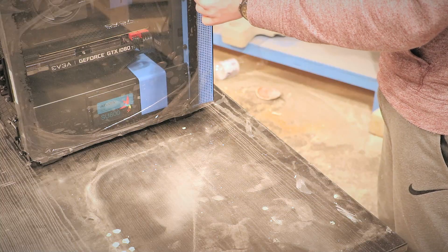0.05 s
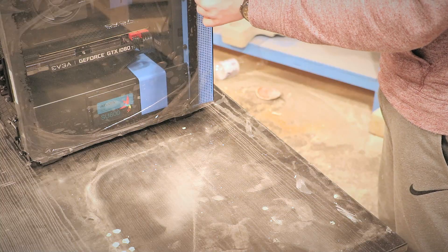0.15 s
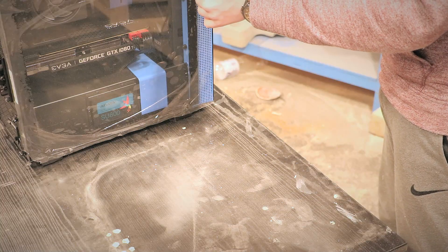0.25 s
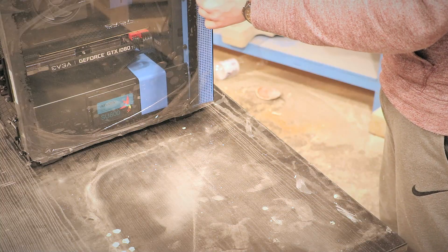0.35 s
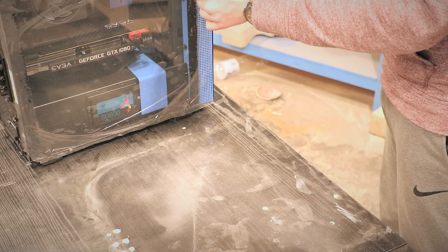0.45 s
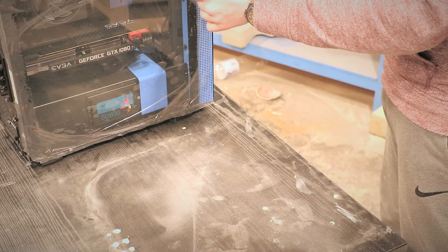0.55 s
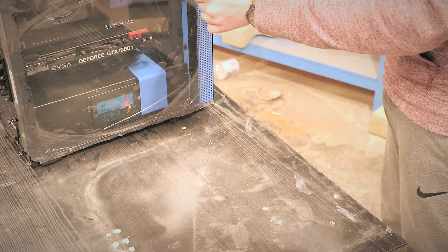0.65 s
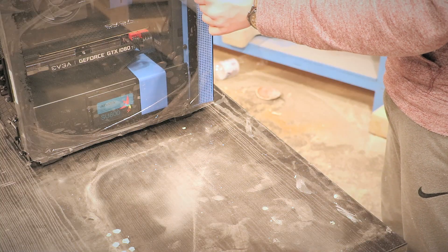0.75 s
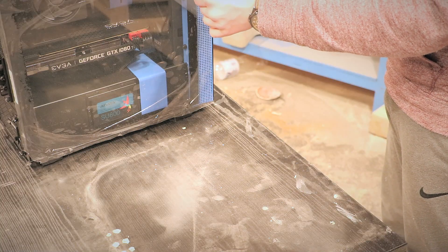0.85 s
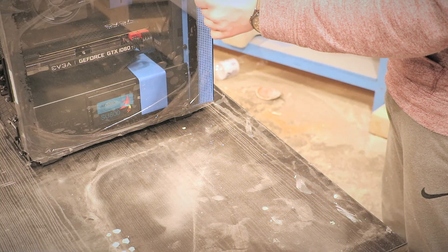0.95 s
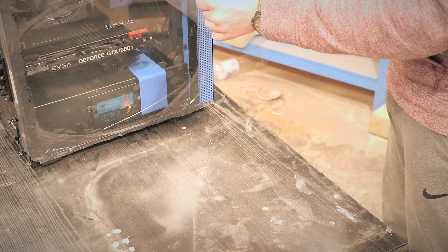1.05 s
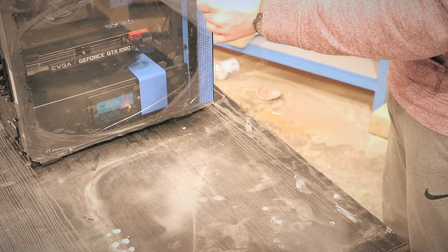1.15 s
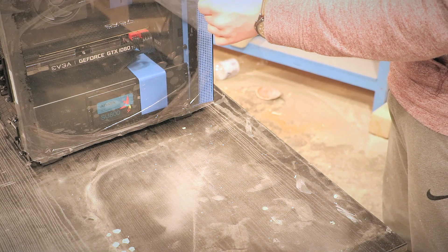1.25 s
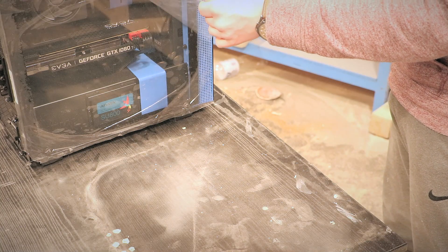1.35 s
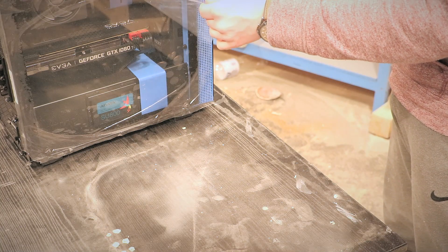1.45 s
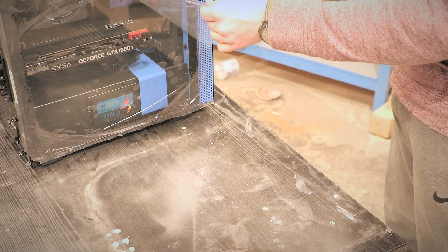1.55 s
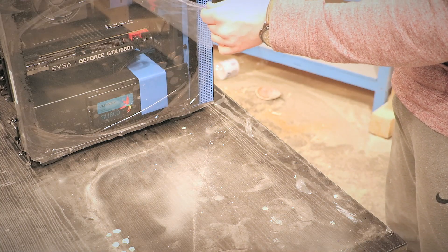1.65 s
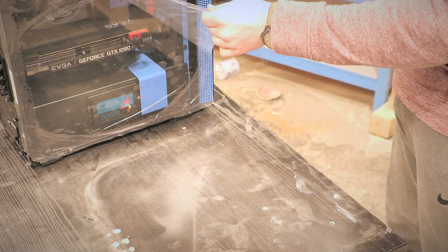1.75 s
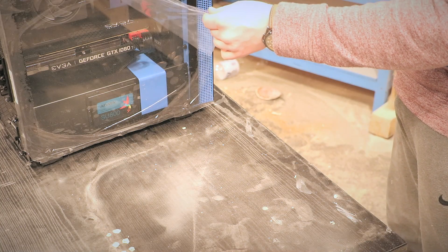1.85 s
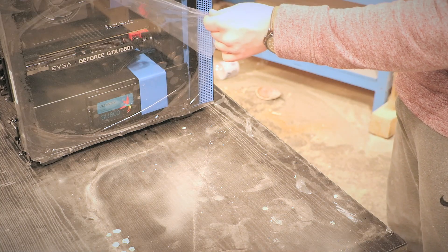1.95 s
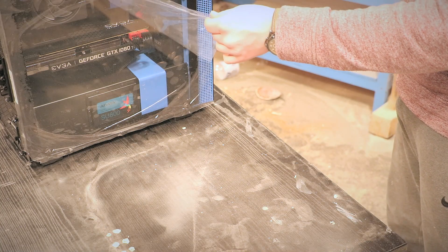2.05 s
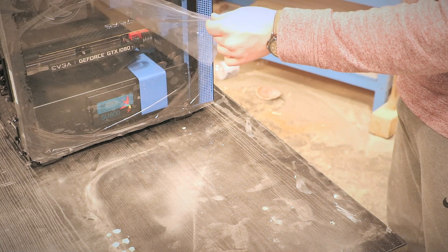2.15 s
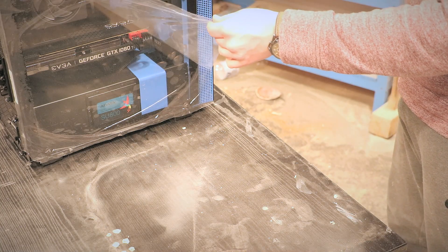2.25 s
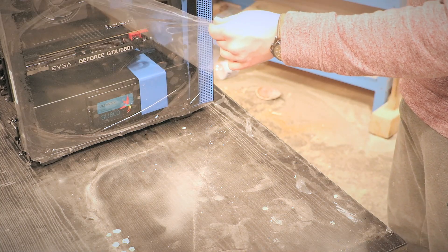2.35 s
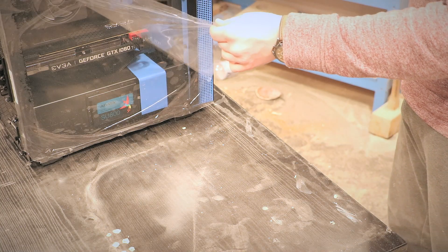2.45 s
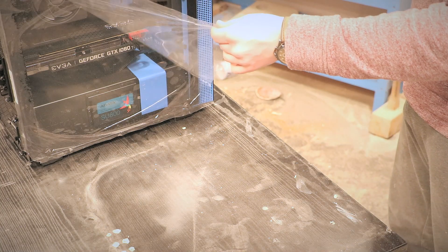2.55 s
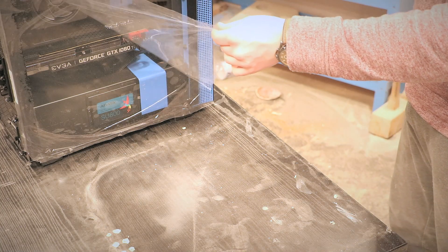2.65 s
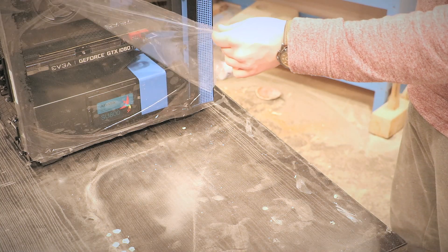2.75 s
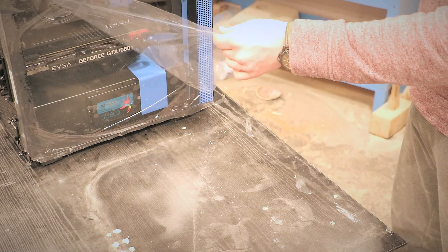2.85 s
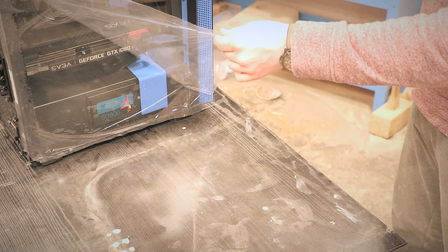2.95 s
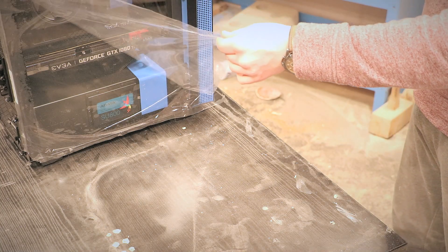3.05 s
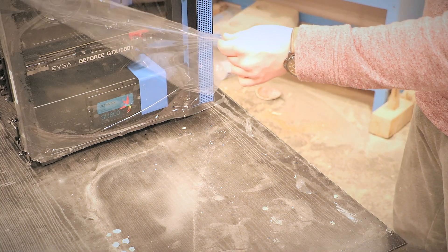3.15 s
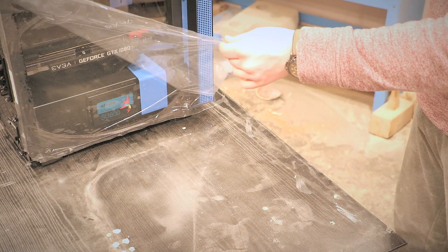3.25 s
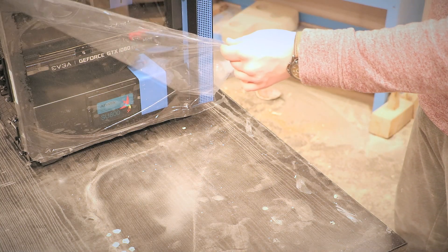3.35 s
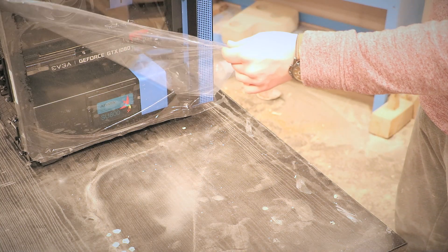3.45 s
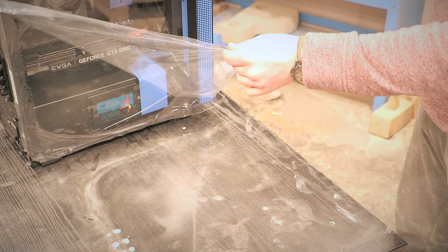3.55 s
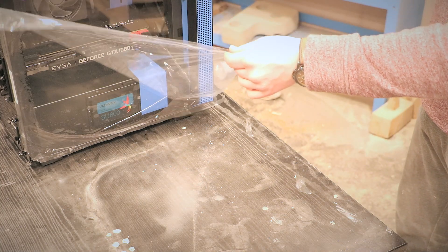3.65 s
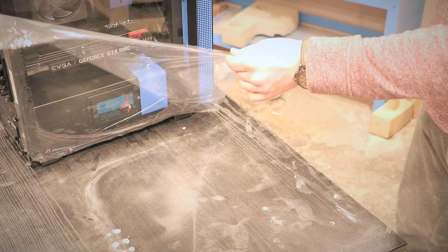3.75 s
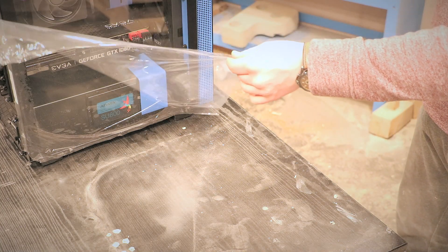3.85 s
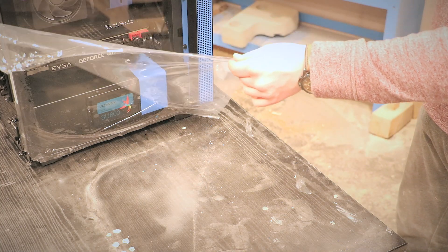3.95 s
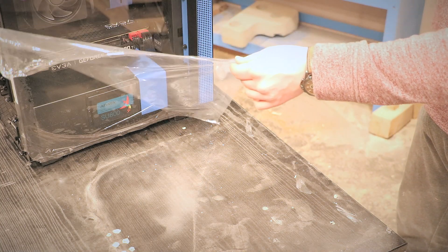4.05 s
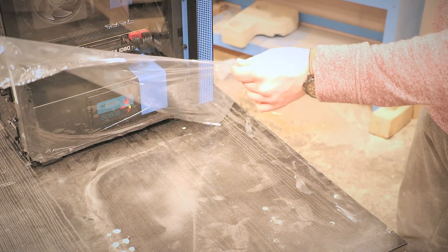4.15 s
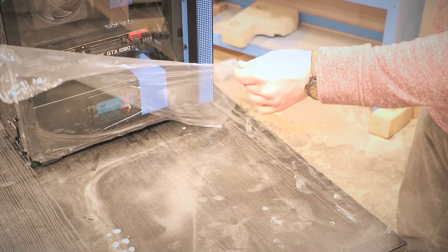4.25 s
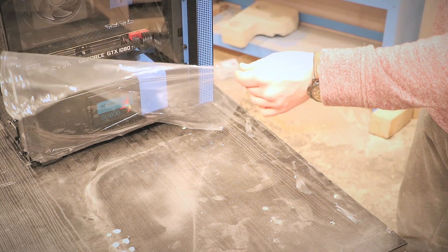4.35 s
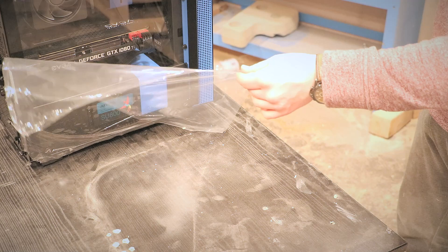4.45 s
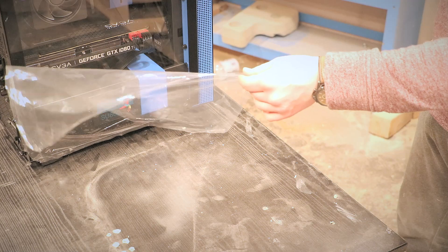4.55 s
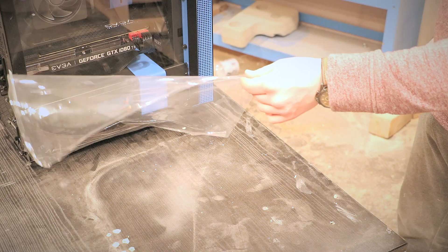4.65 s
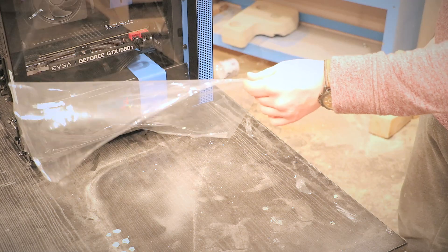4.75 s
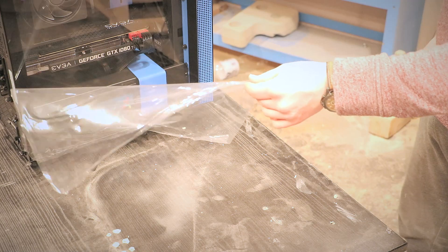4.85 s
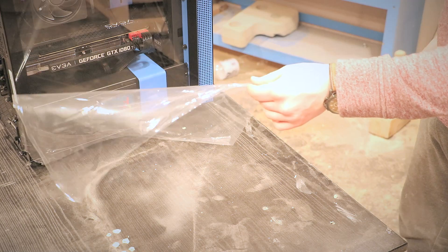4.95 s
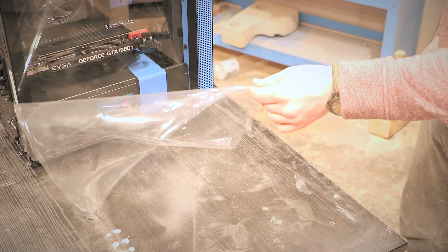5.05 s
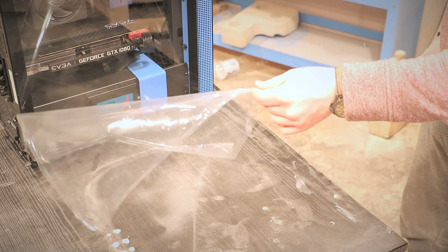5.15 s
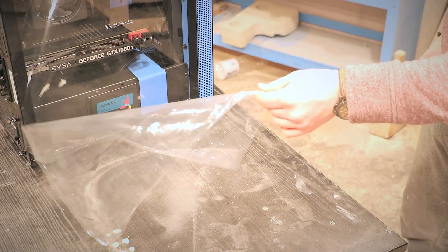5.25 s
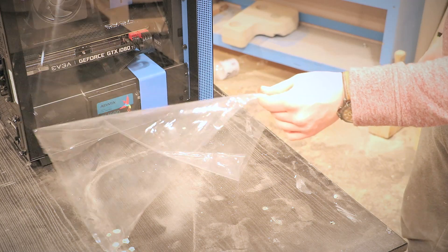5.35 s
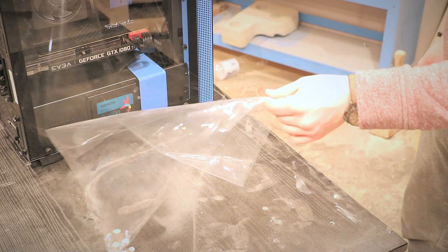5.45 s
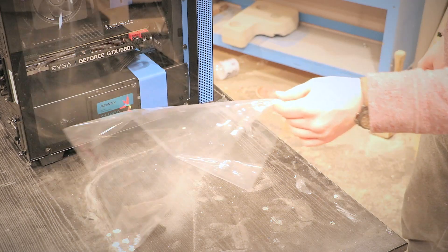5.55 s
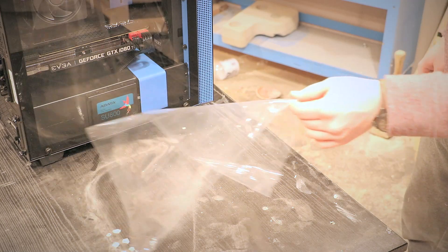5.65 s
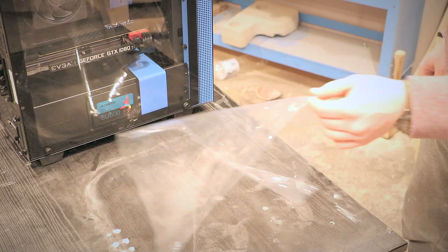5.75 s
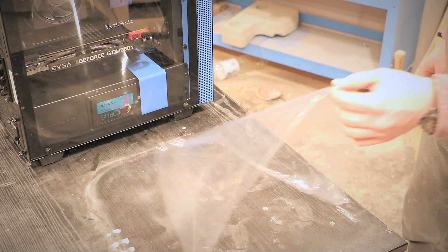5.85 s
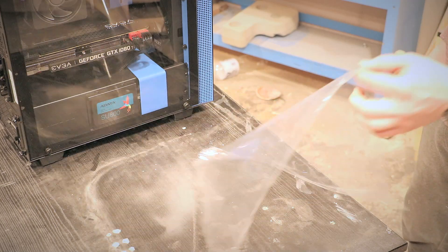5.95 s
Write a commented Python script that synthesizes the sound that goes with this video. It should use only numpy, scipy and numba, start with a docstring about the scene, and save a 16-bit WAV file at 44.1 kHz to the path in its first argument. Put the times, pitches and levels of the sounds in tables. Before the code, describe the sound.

Thin protective plastic film is peeled off a glass panel on a workshop bench. It starts as a quiet, fine crackle dotted with sharp clicks, then grows louder and denser as the pull builds, with a few soft thuds from the sheet. Near the end the film comes free and rustles loosely. The microphone is about a metre away, in a room with a short echo and faint hum and hiss.

```python
"""Peeling film off glass

Thin protective film is pulled off a glass panel on a workshop bench, a metre from a nearly mono
microphone. The glue line lets go in countless tiny ticks, creases buckle with sharp snaps, and the
slack sheet thuds and rustles. The room answers briefly over a faint hiss and mains hum."""
import sys
import numpy as np
from scipy import signal
from scipy.fft import rfft, irfft
from scipy.io import wavfile
from scipy.ndimage import uniform_filter1d
from numba import njit

SR = 44100
rng = np.random.default_rng(int(sys.argv[2]) if len(sys.argv) > 2 else 0)


def wav_record(signal):
    """Record a signal, one row per channel, as 16-bit PCM in the file named by sys.argv[1]."""
    frames = np.transpose(np.atleast_2d(signal))
    bounded = np.clip(frames, -1, 1)
    # unit amplitude maps onto the largest positive 16-bit level
    quanta = np.round(bounded * 32767).astype(np.int16)
    wavfile.write(sys.argv[1], SR, quanta)


N = 265173

# The pull on the film, building as it peels. Each row: time in seconds, crackle level in dB,
# then the low flap, the narrow ring and the bright ticks in dB relative to that level.
PEEL = [(0, -49, -3, -7, -6), (.25, -54, -22, -12, -7), (.45, -49.5, -26, -17, -7),
        (.62, -51.5, -14, -5, -3.5), (.8, -50.5, -6, -15, -4.5), (1.1, -44, -13, -6, -6),
        (1.3, -46.5, -11, -18, -7), (1.5, -48.5, -9, -10, -4.5), (1.68, -47, -10, -7, -5.5),
        (1.8, -43.5, -13, -12, -4), (2.05, -42, -6.5, -24, -12), (2.3, -37.5, -9, -32, -7),
        (2.5, -33, -14, -6, -3.5), (2.65, -37, -7, -7, -2), (2.85, -38.5, -8, 1.5, 0),
        (2.971, -29.5, -12, -7.5, -4), (3.1, -35, -22, -4, -5), (3.3, -39, -6, -12, -4.5),
        (3.4, -36.5, -11, -22, -7.5), (3.49, -39, -7, -5, -8.5), (3.6, -34.5, -6, -18, -6.5),
        (3.8, -35, -6, -15, -7), (4.0, -33.5, -8.5, -14, -9), (4.17, -33, -4.5, -16, -7),
        (4.38, -29, -5, -16, -8), (4.45, -29, -2.5, -23, -11), (4.53, -31.5, 0, -12, -8.5),
        (4.61, -29, -3, -17, -12), (4.7, -29, -0.5, -1.5, -9.5), (4.78, -26.5, -5, -10, -13.5),
        (4.88, -30, -0.5, -5.5, -9), (5.02, -27, -3, -14, -10), (5.1, -30, -7, -12, -12.5),
        (5.185, -29, -1.5, -29, -7.5), (5.279, -27.5, -5, -20, -9)]
# The freed sheet rustling in the hands. Each row reads as in PEEL.
FREED_SHEET = [(5.288, -40.5, 1, -17, -8), (5.34, -44, 4, -3, -6), (5.42, -43, 9, -19, -8),
               (5.54, -46, 2, -21, -3), (5.7, -36.5, -0.5, -27, -10.5), (5.8, -39.5, -0.5, -34, -1.5),
               (5.9, -42, 5, 5.5, -3.5), (5.957, -45.5, 9, -14, -16), (5.98, -29.5, -2, -8, -10),
               (6.01, -28.5, -2, -6, -5)]


def pull():
    """The crackle's four faders in dB, per sample: broad ring, flap, narrow ring and bright ticks."""
    times, db, *relative_db = np.vstack([PEEL, FREED_SHEET]).T
    return [np.interp(np.arange(N) / SR, times, db + offset) for offset in [0] + relative_db]


def glue_crackle(edge_hz, crackle_db, flap_db, narrow_db, bright_db, ticks_a_second=11000):
    """The glue line lets go in dense ticks: few are strong, and they come in bursts that start sharply."""
    chance = rng.random((N * ticks_a_second // SR, 11)).T
    start = chance[0] * N
    slip_at, slip_size = rng.random((400, 2)).T
    bursts = 1 + fading(slip_at * N, 0.58 * slip_size ** 2, fade_s=0.013)
    size = undb(-1.7 * np.log(1 - chance[1])) * bursts[start.astype(int)]
    tick_edge_hz = edge_hz[start.astype(int)]
    narrow_hz = np.where(chance[10] < .6, 3470., 5300.)  # the ticks ring narrowly at two pitches
    bright_hz = 10500 * (540 / tick_edge_hz) ** 0.31  # a hard pull tears wider strips, with duller ticks
    # Each row: centre in Hz, pitch span as a ratio, decay in cycles, level in dB.
    layers = [(3300, 3.6, 1.6, crackle_db - 1.5),
              (1.445 * tick_edge_hz, 3.0, 2.0, flap_db + 0.082),
              (narrow_hz, 1.12, 6.0, narrow_db + 0.13),
              (bright_hz, 2.4, 1.5, bright_db + 2.7)]
    crackle = 0
    for k, (centre_hz, span, cycles, db) in enumerate(layers):
        hz = centre_hz * span ** (chance[2 + k] - .5)
        # equal energy for slow and quick rings, either polarity
        strength = size * np.sqrt(hz) * (2 * chance[6 + k] - 1)
        crackle = crackle + level(rings(start, hz, cycles, strength), db)
    return crackle


def small_creases(crackle_db, per_second=70):
    """Rows like LOUD_SNAPS for the many small creases; a harder pull makes them louder."""
    count = N * per_second // SR
    when, accent = rng.random((count, 2)).T
    pitch, flap, bright = rng.standard_normal((count, 3)).T
    start_s = when * (N / SR - .01)
    db = crackle_db[(start_s * SR).astype(int)] + 13 + 2.5 * accent ** 2
    hz = np.clip(3280 * 1.33 ** pitch, 900, 7000)
    return np.column_stack([start_s, db, hz, -35 + 1.5 * flap, -31 + 9.6 * bright, np.full(count, -29)])


# The loud creases. Each row: start in seconds, strength in dB, ring pitch in Hz, flap trim in dB,
# brightness trim in dB, first tick over the second in dB.
LOUD_SNAPS = [(0.0628, -11, 2800, -16.5, -30, 2), (0.0646, -11, 4300, -19, -26, 5),
              (0.0856, -21, 3610, -19, -33, 0), (0.1724, -10, 3800, -36, -28, 12),
              (0.1908, -24, 3400, -28, -14, 0), (0.2133, -24, 3530, -25, -15, 0),
              (0.273, -13.5, 3800, -29, -21, -1), (0.303, -12, 2930, -32, -17, 1.5),
              (0.3177, -19, 3900, -23, -24, -2), (0.3451, -13, 4940, -32, -36, 0),
              (0.3885, -9.5, 2440, -34, -11, -1), (0.4067, -22, 3530, -26, -16, 6),
              (0.4584, -28, 3510, -34, -20, 0), (0.5054, -42, 5270, -21, -21, 0),
              (0.5234, -24.5, 3560, -21, -27, -2), (0.5305, -22, 1890, -28, -18, 7),
              (0.5482, -25, 3270, -33, -11.5, 7), (0.5517, -20.5, 3730, -34, -21, 6),
              (0.5624, -27, 3650, -25, -25, 0), (0.597, -26, 3900, -28, -18, 2),
              (0.628, -24, 3700, -32, -21, 0), (0.6333, -21, 5030, -33, -14, 0),
              (0.6483, -23, 4640, -35, -6, -4), (0.6665, -26, 3160, -25, -19, 0),
              (0.7034, -22, 3700, -16, -17, 2), (0.826, -27, 2670, -32, -25, -8),
              (0.8476, -11.5, 5700, -34, -16, -2), (0.861, -24, 3510, -36, -3.5, -2),
              (0.9157, -12.5, 3550, -41, -12.5, -4), (0.923, -25, 2500, -20, -7, 4),
              (0.9579, -17, 2600, -44, -17, 3), (1.017, -25.5, 3570, -32, -8, 6),
              (1.0547, -18.5, 2570, -39, -18, 6), (1.076, -18, 2600, -35, -16.5, 10),
              (1.129, -18.5, 1450, -9, -17, 10.5), (1.169, -14.5, 5030, -28, -20, 3.5),
              (1.1744, -22, 3310, -27, -9, -9), (1.2215, -12, 2870, -47, -15.5, 1.5),
              (1.2675, -23, 3660, -29, -18, -4), (1.307, -24, 4880, -32, -17, -2),
              (1.4564, -26.5, 3080, -22, -5.5, 2), (1.5972, -13.5, 3600, -39, -9.5, 8.5),
              (1.6451, -23, 3500, -33, -9, 6), (1.7856, -9.5, 4970, -41, -19, -11),
              (1.795, -13.5, 5360, -28, -6, 3), (1.8433, -18, 3430, -17.5, -20, 0),
              (1.8761, -8.5, 3300, -32, -13.5, -3), (1.9845, -7, 4770, -31, -13.5, -10),
              (2.0073, -32, 4980, -34, -3, 6), (2.038, -25, 2220, -29, -8, -2),
              (2.0821, -19, 3280, -44, -18, 0), (2.0882, -4.5, 5400, -32, -15, -4),
              (2.1588, -10, 3630, -30, -22, 0), (2.184, -6, 5530, -41, -11, 0.5),
              (2.195, -11, 3230, -27, -18, 0), (2.2878, -8.5, 2370, -20, -23, 8),
              (2.388, -10.5, 2170, -23, -13.5, 2), (2.396, -13, 3370, -31, -16.5, 11.5),
              (2.4302, -5, 3600, -50, -16, 0), (2.4773, -2.5, 4670, -21.5, -23, -6),
              (2.5144, -15.5, 3470, -19, -11, 0), (2.5697, -7, 3540, -23.5, -21, 5),
              (2.585, -6.5, 4680, -18.5, -15, 0), (2.6443, -15.5, 1420, -29, -19, 0),
              (2.6537, -16.5, 2130, -24, -12, 6), (2.6574, -4.5, 3770, -28, -23.5, 9),
              (2.6715, -24.5, 4020, -2.5, -18, 0), (2.727, -18, 3380, -30, -12, 4),
              (2.8078, -11, 4500, -38, -13, -3), (2.823, -9, 3340, -34, -13, 3),
              (2.8499, -14, 3500, -20, -10, 0), (2.94, -8, 3280, -34, -15, 3),
              (2.9584, -7, 5200, -18, -25, -3), (2.9985, -11.5, 4800, -13.5, -27, -2),
              (3.0444, -14, 5230, -15, -27, 0), (3.0714, -16, 5020, -14, -27, 0),
              (3.1145, -5.5, 2600, -21, -19, 2), (3.1182, -11, 5000, -34, -17, 0),
              (3.1638, -13, 3660, -19, -12.5, 3), (3.1968, -19, 1560, -25, -15, 2),
              (3.2128, -14, 3740, -31, -18, 4), (3.2211, -10.5, 3590, -33, -19, 8),
              (3.277, -18, 4710, -17, -14, 4), (3.3, -15, 4490, -23, -18, 1),
              (3.37, -13, 4780, -30, -27, 0), (3.3913, -3, 5650, -25.5, -19, -11),
              (3.427, -16, 3540, -34, -23, -3), (3.5183, -18, 3320, -25, -15, 4),
              (3.5384, -14.5, 3440, -17, -16, 0), (3.6314, -15, 3430, -23, -13, 0),
              (3.6754, -19, 3210, -19, -15, 2), (3.7316, -18, 2500, -19, -24, 0),
              (3.7858, -6, 5000, -19, -15, -1), (3.786, -6, 3540, -24, -21, -11),
              (3.824, -13.5, 3460, -16, -21, -4), (3.8816, -29, 2090, -27, -25, 0),
              (4.029, -11.5, 2720, -33, -11, 1), (4.0454, -12, 3770, -12.5, -15, -1),
              (4.1816, -16, 3650, -28, -20, 0), (4.1862, -9.5, 2800, -33, -27, 0),
              (4.3101, -10.5, 3240, -22, -7, -9), (4.351, -10, 3180, -23, -15, -8),
              (4.4255, -21.5, 3190, -9, -28, 0), (4.6232, -11, 2130, -22, -29, 0),
              (4.654, -13, 2850, -23, -28, -3), (4.685, -11, 2880, -21, -28, -3),
              (4.709, -5, 3180, -35, -27, 3), (4.7855, -10, 5030, -21, -22, 3),
              (4.7968, -12, 4290, -27, -20, 6), (4.8997, -15, 3250, -23, -24, 0),
              (4.9374, -14, 3530, -32, -23, 2), (4.9486, -19, 3210, -33, -23, 6),
              (4.959, -10, 1840, -41, -23, 0), (4.9844, -13.5, 3530, -11, -28, 0),
              (4.9978, -4.5, 4660, -25, -37, 0), (5.0412, -14, 3460, -40, -32, -2),
              (5.0678, -10, 1890, -23, -25, 0), (5.0704, -12.5, 2100, -25, -16, 7),
              (5.0867, -11, 1860, -25, -29, 0), (5.1502, -21, 3900, -18, -16, -3),
              (5.1684, -2, 4400, -31, -24, 0), (5.177, -7, 4920, -29, -28, 0),
              (5.205, -15, 1420, -25, -27, 0), (5.227, -4.5, 1940, -33, -33, -2),
              (5.2629, -23, 2260, -29, -18, 0), (5.2624, -8.5, 1890, -23, -28, 0),
              (5.272, -9.5, 1820, -16, -32, 0), (5.2805, -12, 1770, -16, -30, 0),
              (5.383, -5.5, 1070, -4, -13.5, 7), (5.3839, -1, 2030, -11, -25, -6),
              (5.3934, -29, 1230, -20, -27, 0), (5.3986, -6.5, 1990, -29, -24, 2),
              (5.5114, -27, 1310, -16, -26, 0), (5.6387, -33.5, 1530, 4, -28, 3),
              (5.8687, -8, 1380, -12, -21, 4), (5.8724, -9, 1470, -22, -25, 2),
              (5.898, -16, 1470, -13, -28, 0), (5.9034, -11.5, 3350, -17.5, -27, -2),
              (5.9462, -26, 1173, -6, -13, 1), (5.9858, -18, 990, -12, -18, 5)]


def crease_snaps(crackle_db, ring_delay_s=0.001112):
    """A crease buckles: two bright ticks, a short ring, a settling rustle and, apart, a slower flap."""
    start_s, db, hz, flap_db, bright_db, first_db = np.vstack([LOUD_SNAPS, small_creases(crackle_db)]).T
    chance = rng.random((len(start_s), 4)).T
    ring_start = (start_s + ring_delay_s) * SR
    size = np.sign(chance[0] - .5) * undb(db)
    ring_cycles = 0.72 * (3500 / hz) ** 0.7  # wide creases ring lower and longer
    ring = rings(ring_start, hz, ring_cycles, size * undb(1))
    first_hz, second_hz = 7500 * 1.7 ** chance[2:]
    tick_size = size * undb(bright_db + 16)
    first_tick = rings(start_s * SR, first_hz, cycles=.6, size=tick_size * undb(first_db))
    second_tick = rings(ring_start, second_hz, cycles=.6, size=tick_size)
    ticks = high_pass(first_tick + second_tick, np.full(N, 3000.), damping=1.0)
    noise = rng.standard_normal(N)
    rustle = fading(ring_start, undb(db - 25) * hz / 3500, fade_s=0.014) * uniform_filter1d(noise, size=5)
    fizz = fading(ring_start, undb(db + bright_db - 15.5), fade_s=0.01) * np.diff(noise, prepend=0)
    flap_hz = 850 * 1.5 ** (chance[1] - .5)
    flaps = rings(ring_start, flap_hz, cycles=1.0, size=size * undb(flap_db + 6.5))
    # a flap moves too little air for bass
    return ring + ticks + rustle + fizz, high_pass(flaps, np.full(N, 450.), damping=1.26)


# The sheet's low edge, which rises with the pull. Each row: time in seconds, cutoff in Hz.
SHEET_EDGE = [(0, 605), (2.3, 626), (3.9, 570), (4.5, 890), (4.9, 1020), (5.2, 980), (5.3, 724), (5.8, 707),
              (6.01, 710)]


def taut_sheet(x, edge_hz, leak_db=-11.5):
    """The taut sheet radiates little below its edge; a little leaks through all the same."""
    thinned = high_pass(x, edge_hz, damping=1.85)
    return high_pass(thinned, edge_hz, damping=.77) + undb(leak_db) * x


# Soft thuds of the sheet. Each row: start in seconds, strength in dB, pitch in Hz.
THUDS = [(0.064, -37.5, 360), (1.498, -41, 440), (3.724, -40, 300), (3.775, -45, 450), (4.344, -39, 328),
         (4.789, -37, 337), (4.997, -29, 456), (5.382, -26, 600)]


def sheet_thuds():
    """The slack sheet jerks taut: a few cycles of bass."""
    start_s, db, hz = np.transpose(THUDS)
    return rings(start_s * SR, hz, cycles=1.43, size=undb(db + 5))


def room_echo(x, bass_t60_s=0.48, send_db=-17):
    """The workshop answers with a short, dull mono tail."""
    lags = rng.integers(250, 1800, size=8)
    gains = undb(-60 * lags / SR / bass_t60_s)
    return undb(send_db) * walls(x + 1e-18, lags, gains, damping=0.78)


@njit
def walls(x, lags, gains, damping):
    """Sound bounces between walls: eight delay lines feed each other, duller on every round."""
    lines, dulled, echo = np.zeros((8, 4096)), np.zeros(8), np.zeros(len(x))
    for i in range(len(x)):
        for k in range(8):
            dulled[k] += (1 - damping) * (gains[k] * lines[k, (i - lags[k]) & 4095] - dulled[k])
            echo[i] += dulled[k]
        for k in range(8):
            lines[k, i & 4095] = x[i] + dulled[k] - echo[i] / 4
    return echo


# The tones of the hum. Each row: pitch in Hz, rms level in dB.
HUM_TONES = [(50.0, -55.5), (100.0, -69.5), (123.0, -73.5)]


def mains_hum():
    """Low mains hum, each tone wavering slightly in level."""
    t = np.arange(N) / SR
    return sum(np.sqrt(2) * undb(db + .5 * wander(5.66)) * np.sin(2 * np.pi * hz * t)
               for hz, db in HUM_TONES)


# The tone of the hiss both capsules share. Each row: frequency in Hz, relative gain in dB.
HISS_MID_EQ = [(30, 3), (70, 3.5), (150, -2), (400, 1.5), (1000, -9.5), (4000, -15), (15000, -16)]
# The tone of the hiss that differs between them. Each row: frequency in Hz, relative gain in dB.
HISS_SIDE_EQ = [(30, -27), (110, 4), (700, -2.5), (1500, -23), (4000, -31), (7000, -20), (15000, -10)]


def hiss():
    """A faint bed of noise, a little different left and right."""
    mid = level(equalise(rng.standard_normal(N), HISS_MID_EQ), db=-56.5)
    side = level(equalise(rng.standard_normal(N), HISS_SIDE_EQ), db=-72.5)
    return mid + side * np.array([[1], [-1]])


def undb(db):
    """Gain of a level in dB."""
    return 10 ** (np.asarray(db) / 20)


def level(x, db):
    """Scale to unit rms, then apply a gain in dB."""
    return x * undb(db) / np.sqrt(np.mean(x ** 2))


def wander(rate_hz):
    """Random levels that glide into each other; spread near 1."""
    hold = int(SR / rate_hz)
    return uniform_filter1d(np.repeat(rng.standard_normal(N // hold + 1), hold), hold)[:N]


def fading(start, size, fade_s):
    """Envelope that jumps at each start sample and dies away."""
    jumps = np.bincount(start.astype(int), size, N)[:N]
    return signal.lfilter([1], [1, -np.exp(-1 / (fade_s * SR))], jumps)


@njit
def rings(start, hz, cycles, size):
    """Damped sines, one per start sample, that lose a factor e in the given number of cycles."""
    y = np.zeros(N)
    decay_samples = cycles * SR / hz
    for k in range(len(start)):
        pole = np.exp(2j * np.pi * hz[k] / SR - 1 / decay_samples[k])
        phasor = size[k] + 0j
        for i in range(int(start[k]), min(N, int(start[k] + 6 * decay_samples[k]))):
            y[i] += phasor.imag
            phasor *= pole
    return y


@njit
def high_pass(x, hz, damping):
    """State-variable high-pass with a cutoff for every sample."""
    y, band_state, low_state = np.empty(len(x)), 0., 0.
    for i in range(len(x)):
        g = np.tan(np.pi * hz[i] / SR)
        band = (band_state + g * (x[i] - low_state)) / (1 + g * (g + damping))
        low = low_state + g * band
        y[i] = x[i] - damping * band - low
        band_state, low_state = 2 * band - band_state, 2 * low - low_state
    return y


def equalise(x, points):
    """Causal filter through (Hz, dB) points, from the folded cepstrum of the log gain."""
    hz, db = np.transpose(points)
    curve_db = np.interp(np.log(np.linspace(1, SR / 2, 2049)), np.log(hz), db)
    cepstrum = irfft(curve_db * np.log(10) / 20)
    cepstrum[1:2048] *= 2
    cepstrum[2049:] = 0
    impulse = irfft(np.exp(rfft(cepstrum)))[:2048]
    return signal.fftconvolve(x, impulse)[:N]


# The colour of the microphone and bench. Each row: frequency in Hz, gain in dB.
MIC_AND_BENCH_EQ = [(60, -38), (200, -4.5), (500, -2), (1000, -3), (2300, -4.5), (3000, -2), (3470, 0),
                    (4100, -2), (5300, 0.5), (6800, -5), (12500, -4), (15700, -7)]


def scene():
    """Film and room echo sit dead centre over the hum; only the hiss has width."""
    crackle_db, flap_db, narrow_db, bright_db = pull()
    edge_hz = np.interp(np.arange(N) / SR, *np.transpose(SHEET_EDGE))
    snaps, flaps = crease_snaps(crackle_db)
    crackle = glue_crackle(edge_hz, crackle_db, flap_db, narrow_db, bright_db)
    film = taut_sheet(snaps + crackle, edge_hz) + flaps + sheet_thuds()
    return equalise(film + room_echo(film), MIC_AND_BENCH_EQ) + mains_hum() + hiss()


def record(dry):
    """The recorder cuts the top steeply above 15.9 kHz."""
    return signal.sosfilt(signal.ellip(10, .2, 70, 15900, fs=SR, output="sos"), dry)


dry = scene()
out = record(dry)
wav_record(out)
```